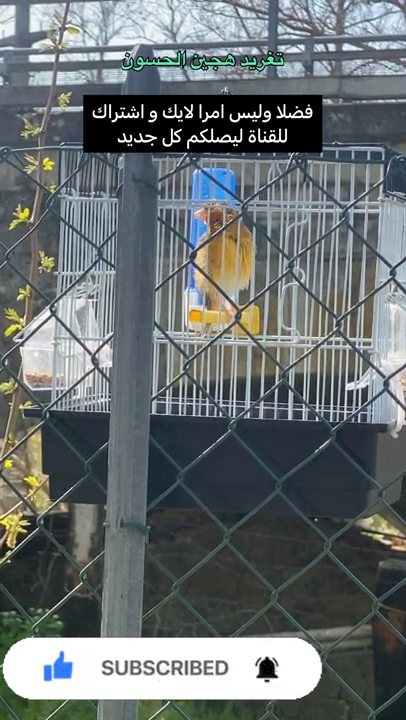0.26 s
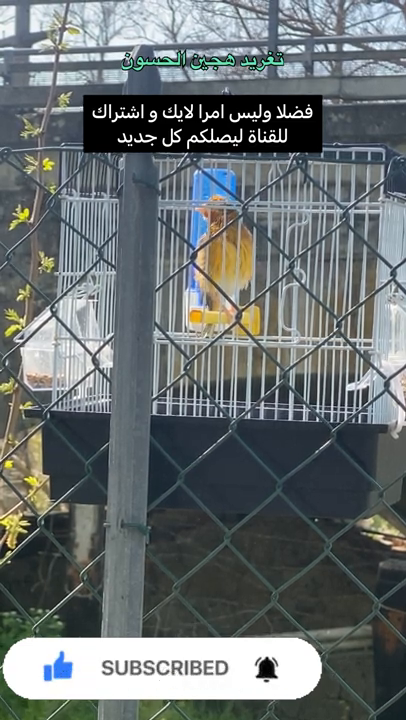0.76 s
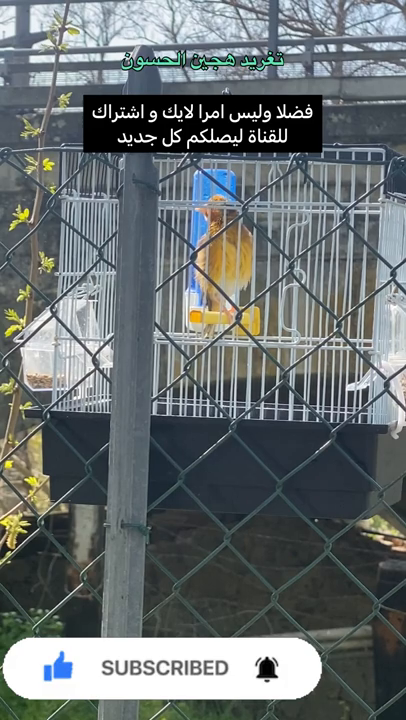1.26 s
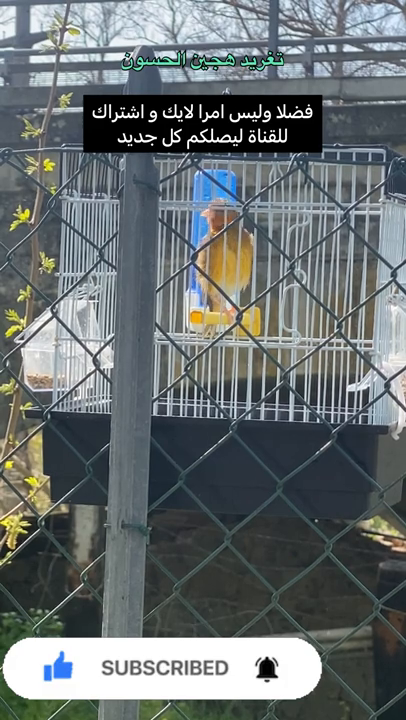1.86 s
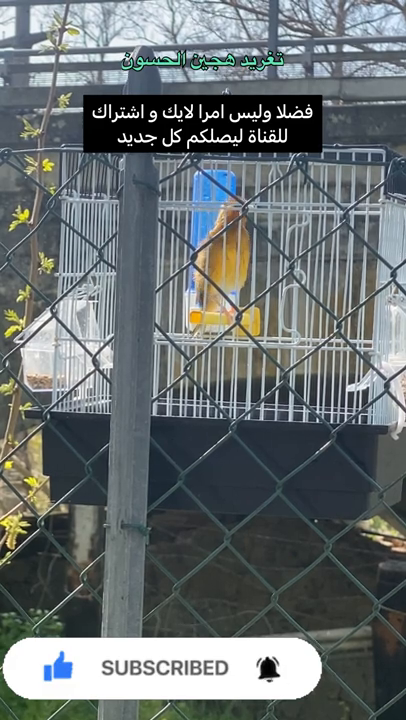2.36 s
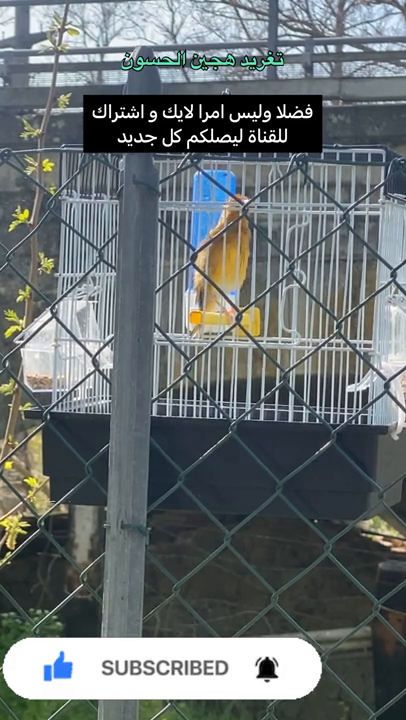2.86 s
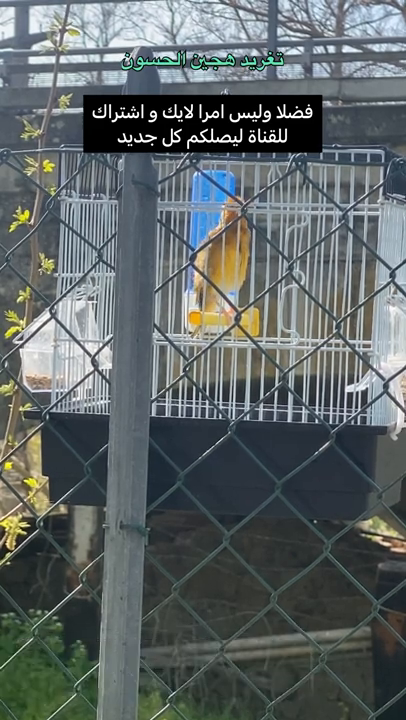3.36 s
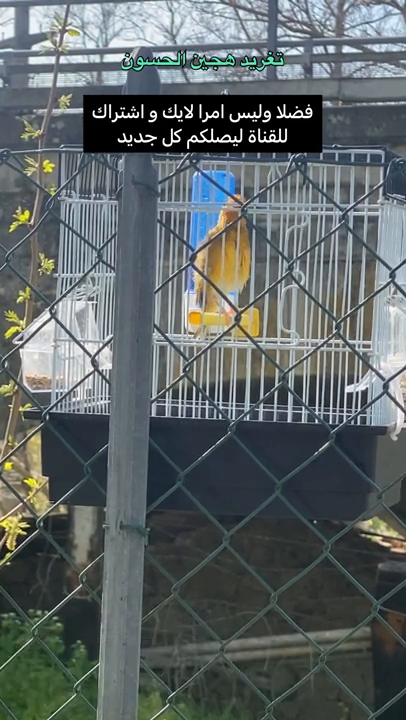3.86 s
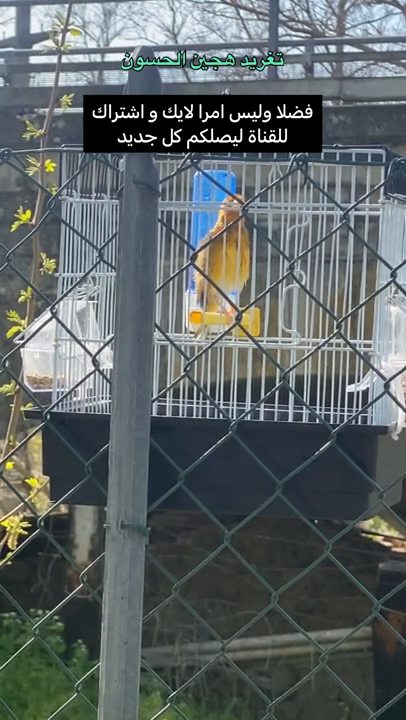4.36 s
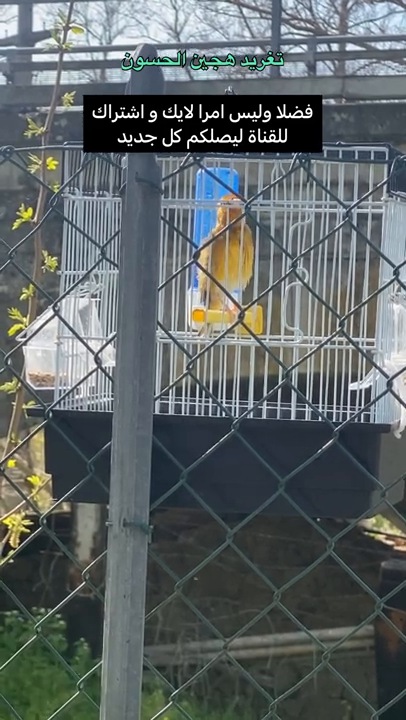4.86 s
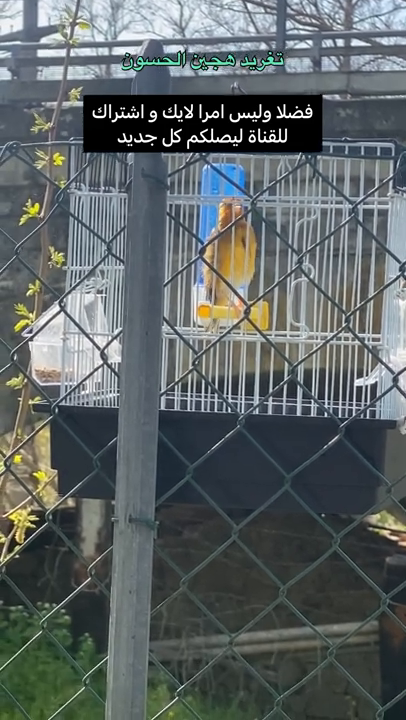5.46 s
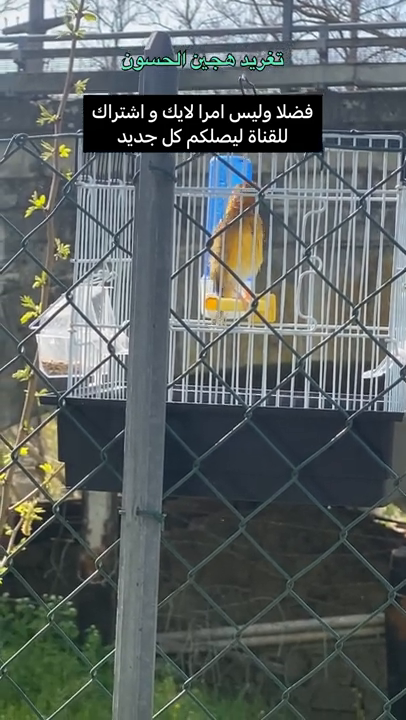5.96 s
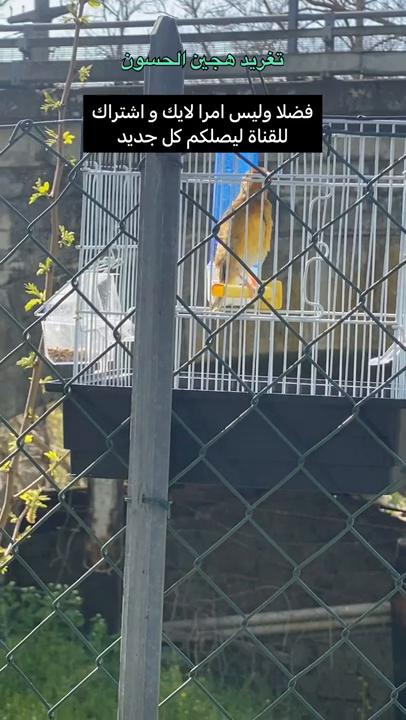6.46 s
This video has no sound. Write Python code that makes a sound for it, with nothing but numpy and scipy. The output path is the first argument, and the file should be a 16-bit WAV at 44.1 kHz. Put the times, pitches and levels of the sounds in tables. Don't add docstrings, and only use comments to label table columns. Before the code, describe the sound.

A caged finch sings a fast, varied song of whistles, chirps, buzzes and trills outdoors, with soft wind thumps on the microphone.

```python
import sys
import numpy as np
from scipy import signal
from scipy.fft import rfft, irfft
from scipy.io import wavfile
from scipy.ndimage import uniform_filter1d

SR = 44100
rng = np.random.default_rng(int(sys.argv[2]) if len(sys.argv) > 2 else 0)


def boost(x):
    u = np.asarray(x, float) / 20
    return 10 ** u


def pcm_store(signal):
    levels = np.round(np.clip(np.atleast_2d(signal), -1, 1) * 32767)
    wavfile.write(sys.argv[1], SR, levels.astype(np.int16).T)


N = 296352
WAVER_HZ = 12


def at_hz(points, hz):
    p = np.array(points, float)
    return np.interp(np.log(hz + 1), np.log(p[:, 0] + 1), p[:, 1])


def colour(x, points):
    return irfft(rfft(x) * boost(at_hz(points, np.fft.rfftfreq(N, 1 / SR))), N)


def rms_one(x):
    return x / np.sqrt(np.mean(x ** 2) + 1e-20)


def drift(rate_hz):
    r = np.exp(-2 * np.pi * rate_hz / SR)
    wander = signal.lfilter([1], [1, -2 * r, r * r], rng.standard_normal(N + SR))
    return rms_one(wander[SR:])


def sine(hz):
    return np.sin(2 * np.pi * np.cumsum(hz) / SR)


def span(rows):
    s, *columns = np.transpose(rows)
    i = np.arange(int((s[0] - .002) * SR), min(int((s[-1] + .002) * SR), N))
    fade = np.clip(np.minimum(i - i[0] - .001 * SR, i[-1] - i) / (.002 * SR), 0, 1)
    return i, fade, [np.interp(i / SR, s, c) for c in columns]


def distance():
    far_db, hum_hz, hum_db = -52, 291.3, -62
    # frequency in Hz, level in dB per Hz.
    far = [(120, 2.5), (300, -1.5), (500, -5), (1300, -8.5), (1900, -16), (3200, -19.5), (4400, -25),
           (5500, -31.5), (7400, -44.5), (13000, -48.5)]
    # frequency in Hz, likeness 0-1.
    likeness = [(100, 0.99), (300, 0.94), (550, 0.64), (1200, 0.52), (1600, 1), (2200, 0.95)]
    # frequency in Hz, excess in dB.
    left_excess = [(120, -3), (380, -0.5), (800, -5), (1250, -2.5), (1700, 0)]
    hz = np.fft.rfftfreq(N, 1 / SR)
    alike = np.clip(at_hz(likeness, hz), 0, 1)
    mid, side = rfft(rng.standard_normal((2, N)))
    pair = np.sqrt(1 + alike) * mid + np.sqrt(1 - alike) * side * [[1], [-1]]
    tilt_db = at_hz(left_excess, hz) * [[.5], [-.5]]
    wash = rms_one(irfft(pair * boost(at_hz(far, hz) + tilt_db) * (hz > 90), N))
    hum = boost(hum_db + 3.25 * drift(3.8)) * sine(hum_hz + 3 * drift(2.95))
    return boost(far_db + 0.42 * drift(0.4)) * wash + hum


def wind():
    # time in seconds, level in dB.
    gusts = [(0.0, -64.5), (0.03, -49.5), (0.63, -38.5), (0.67, -49.5), (1.33, -45.5), (1.35, -51),
             (3.84, -35), (4.04, -46), (4.12, -34), (5.33, -42.5), (5.97, -43), (5.99, -46), (6.05, -37.5),
             (6.23, -48), (6.51, -31), (6.59, -47), (6.64, -30), (6.72, -39)]
    # frequency in Hz, level in dB per Hz.
    eddies = [(12, -22.5), (20, -35.5), (45, 2), (64, 8.5), (78, 3.5), (173, -16.5), (260, -40.5),
              (340, -67), (570, -120)]
    level_db = np.interp(np.arange(N) / SR, *np.transpose(gusts))
    shared, own = (rms_one(colour(rng.standard_normal(N), eddies) * boost(2.6 * drift(16))) for _ in "LR")
    return boost(level_db) * (shared + boost(-24) * own * [[1], [-1]])


def vary(shape, s, db):
    scatter_share, scatter_db = .006, 1.5
    rows = np.array(shape, float)
    rows[:, 0] += s
    rows[:, 1] *= 1 + scatter_share * rng.standard_normal()
    rows[:, 2] += db + scatter_db * rng.standard_normal(len(rows))
    return rows


def notes(kind, rows):
    before, moved, swell_db, dying_db, bent, gained = kind
    onset_share = .42
    played = []
    for s, length, from_hz, to_hz, db in rows:
        note = []
        for u, p, g in ((0, 0, 0), (onset_share, bent, gained), (1, 1, 1)):
            pitch_hz = from_hz + p * moved * (to_hz - from_hz)
            note.append((s - (1 - u) * before * length, pitch_hz, db - (1 - g) * swell_db))
        note.append((s + (1 - before) * length, to_hz, db - dying_db))
        played.append(note)
    return played


def whistles():
    # time in seconds, pitch in Hz, level in dB.
    twitter = [
        [(.136, 2247, -55.5), (.158, 2664, -38)],
        [(.156, 2240, -42.5), (.166, 3020, -35), (.178, 3040, -36), (.184, 2996, -49.5), (.198, 3070, -48)],
        [(.797, 2500, -56), (.81, 3250, -48.5), (.826, 2780, -51)],
        [(.807, 3270, -49), (.813, 4060, -52), (.823, 4570, -52)],
        [(.828, 2940, -59.5), (.846, 3120, -54.5), (.86, 3310, -41.5), (.872, 3840, -46.5), (.884, 3670, -48.5)],
        [(.84, 2500, -55), (.858, 2940, -50.5)],
        [(.876, 2880, -43), (.892, 3130, -35.5), (.905, 3222, -39.5), (.93, 3264, -39.5), (.94, 3150, -51.5),
         (.95, 3640, -56), (.957, 3800, -55.5), (.965, 3990, -59)],
        [(1.806, 2110, -43.5), (1.812, 3730, -43.5), (1.82, 4160, -34.5), (1.832, 4340, -38.5),
         (1.841, 4540, -48.5)],
        [(2.082, 5050, -49), (2.091, 5590, -37.5), (2.104, 5710, -44), (2.116, 5060, -54)],
        [(2.165, 3430, -49), (2.172, 3163, -34.5), (2.198, 3230, -47), (2.214, 3256, -52), (2.228, 3395, -57.5),
         (2.25, 3390, -53)],
    ]
    # time in seconds,
    # pitch in Hz, level in dB.
    hooks = [
        [(1.182, 6680, -60.5), (1.192, 5950, -42.5), (1.204, 5580, -39.5), (1.215, 5640, -49)],
        [(.665, 3630, -58), (.7, 3720, -57)],
        [(5.457, 4210, -45), (5.475, 4480, -52)],
        [(.155, 3800, -53.5), (.159, 4700, -50.5)],
        [(.341, 3740, -59), (.346, 3170, -36.5), (.351, 2790, -37.5), (.362, 2690, -47.5), (.368, 2920, -53)],
        [(.686, 5600, -62.5), (.703, 5570, -44.5), (.714, 5526, -30.5), (.728, 5230, -48), (.75, 5230, -49)],
        [(.25, 5400, -50), (.263, 6500, -45), (.28, 7300, -46.5), (.298, 8100, -48)],
        [(2.6, 1990, -59), (2.615, 2600, -55)],
        [(2.625, 3050, -52), (2.65, 4400, -51)],
        [(4.493, 2990, -54), (4.51, 3350, -48), (4.522, 3730, -55.5), (4.531, 3780, -54)],
        [(4.494, 2420, -57.5), (4.506, 2640, -55.5), (4.521, 3400, -58)],
    ]
    # time in seconds, pitch in Hz, level in dB.
    long_whistles = [
        [(2.603, 2950, -54.5), (2.675, 7660, -29), (2.684, 7630, -47), (2.696, 7700, -75)],
        [(2.792, 4370, -44), (2.798, 4430, -34.5), (2.81, 4623, -32.5), (2.84, 4570, -32), (2.864, 4650, -31.5),
         (2.873, 4390, -39), (2.882, 4514, -29), (2.921, 4580, -40.5)],
        [(4.522, 3120, -65), (4.554, 3170, -35), (4.588, 3135, -29.5), (4.618, 3077, -32), (4.678, 3080, -34),
         (4.716, 3090, -42.5)],
        [(5.314, 4800, -32), (5.326, 6400, -26), (5.339, 7060, -30.5), (5.362, 7200, -61)],
        [(5.472, 5270, -40.5), (5.484, 5140, -40.5), (5.505, 5480, -51.5), (5.526, 5834, -37.5),
         (5.597, 5910, -31), (5.725, 6080, -48.5), (5.745, 5380, -28.5), (5.752, 5360, -29), (5.764, 5030, -53)],
        [(5.52, 4590, -53.5), (5.548, 3940, -51.5), (5.61, 3658, -45.5), (5.715, 3544, -46.5),
         (5.738, 3700, -56), (5.801, 2130, -41), (5.815, 1910, -62), (5.84, 1840, -57)],
    ]
    # multiple of pitch, level in dB.
    lower_overtones = [(2, -21.5), (3, -26.5)]

    # share of length before the peak, share of pitch move done there, swell in dB,
    # dying in dB, shares of that move and of the swell done in the quick start.
    chip = (0.44, 1.2, 19, 24, 0.36, .5)
    swell = (0.82, .95, 17.5, 4.6, .5, 0.47)
    flick = (0.56, 0.94, 19.3, 13.4, .58, 0.74)
    drop = (0.52, 0.85, 14, 7, .55, 0.61)
    glide = (0.45, 0.82, 3.3, 6.1, 0.2, .45)
    # peak time in seconds, length in seconds, from Hz, to Hz, peak level in dB.
    chips = [(1.23, 0.031, 4030, 4270, -36), (1.494, 0.046, 6020, 5680, -39.5),
             (1.51, 0.022, 1960, 3060, -38.5), (1.792, 0.029, 5840, 5610, -28.5),
             (5.314, 0.017, 3080, 4160, -33)]
    swells = [(1.526, 0.02, 3800, 4410, -37.5), (2.128, .055, 3600, 4920, -41.5),
              (2.412, 0.039, 3130, 4314, -35.5), (2.738, 0.016, 6300, 5460, -21.5),
              (3.447, 0.021, 2164, 3474, -34.5), (5.309, 0.024, 3120, 3330, -45.5),
              (5.449, 0.032, 2930, 3780, -40.5), (6.489, 0.021, 3114, 3550, -29)]
    flicks = [(2.778, 0.027, 2620, 4520, -27.5), (2.971, 0.022, 2770, 3763, -29.5),
              (2.992, 0.021, 2050, 3590, -34.5), (3.426, 0.026, 2460, 3754, -29),
              (5.989, 0.025, 2820, 4436, -31.5), (6.17, 0.026, 3000, 4480, -31.5)]
    drops = [(0.325, 0.048, 5290, 4820, -42.5), (2.317, 0.048, 7520, 5900, -36),
             (2.323, 0.038, 5850, 4940, -34), (2.499, 0.034, 5480, 4510, -44.5),
             (2.498, .024, 7070, 5540, -34.5), (2.56, 0.018, 7220, 5650, -30),
             (2.565, 0.013, 5140, 4440, -43)]
    glides = [(1.218, 0.013, 2300, 4090, -41.5), (2.382, 0.0067, 2124, 3200, -48),
              (2.472, 0.014, 2460, 2330, -51.5), (5.457, 0.024, 4420, 5480, -26)]

    # seconds after onset, pitch in Hz, level in dB.
    plunge = [(.003, 7230, -58), (.0055, 6300, -38.5), (.008, 4800, -29)]
    # seconds after onset, share of the held pitch, level in dB.
    dive_hold = [(0.011, .94, -33.5), (0.019, .99, -29.5), (0.029, 1.001, -42.5), (.048, .999, -46),
                 (.056, 1.002, -53.5)]
    # seconds after onset, pitch in Hz, level in dB.
    afternote = [(.031, 3040, -53.5), (.04, 2700, -55.5), (.048, 2650, -51)]
    # onset in seconds, level in dB, held pitch in Hz, afternote level in dB.
    dives = [
        (0.957, 0, 4350, -3),
        (1.391, -5, 4090, -3),
        (1.676, -1.5, 4040, -11),
        (1.988, -1, 4145, -31),
    ]

    # seconds after onset, pitch in Hz, level in dB.
    turn_shape = [
        [(0, 3100, -53), (.012, 3133, -48), (.026, 3264, -34.5), (.034, 3550, -45), (.043, 3380, -55.5)],
        [(.043, 3360, -55), (.049, 3030, -63), (.056, 2870, -44.5)],
        [(.03, 2607, -58.5), (.045, 2626, -42), (.06, 2680, -37.5), (.074, 2720, -49.5), (.09, 2920, -58),
         (.104, 3015, -50), (.113, 3160, -44)],
    ]
    # onset in seconds, level in dB.
    turns = [(1.278, -2), (1.573, -1.5), (1.876, 0.4)]
    # seconds after onset, pitch in Hz, level in dB.
    under_shape = [
        [(.001, 2404, -52), (.019, 2755, -45.5)],
    ]
    # onset in seconds, level in dB.
    unders = [(1.281, 0), (1.573, -0.5), (1.875, -3), (5.287, -7.5), (5.421, -2)]
    # seconds after onset, pitch in Hz, level in dB.
    slide_shape = [
        [(.012, 6810, -41), (.0135, 6450, -28.5), (.015, 6070, -28.5), (.017, 5190, -28.5),
         (.0195, 4660, -38.5)],
        [(.027, 4590, -44), (.034, 4190, -43), (.042, 3724, -43), (.048, 3780, -43)],
        [(.047, 3200, -42.5), (.055, 3106, -39.5), (.071, 2290, -37.5), (.081, 2150, -50)],
    ]
    slides = [3.723, 3.8209, 3.9161, 4.0089, 4.099, 4.1903, 4.283, 4.377]
    # start in seconds, length in seconds, pitch scatter in Hz.
    rasps = [(.795, .028, 200), (.85, .035, 60), (1.212, .03, 120), (.25, .09, 110), (1.305, .03, 50),
             (1.51, .03, 110), (1.815, .03, 120), (2.11, .04, 100), (2.62, .07, 60), (2.762, .022, 150),
             (5.315, .045, 120), (5.455, .04, 110), (5.73, .035, 110), (6.475, .025, 60)]

    out = np.zeros(N)
    waver_hz, flutter_db = WAVER_HZ * drift(150), .8 * drift(68)
    rasp = drift(370)
    for s, length, scatter_hz in rasps:
        i = slice(int(s * SR), int((s + length) * SR))
        waver_hz[i] += scatter_hz * rasp[i]

    played = long_whistles + twitter + hooks
    for k, db in lower_overtones:
        played = played + [np.multiply(long_whistles[-1][:4], [1, k, 1]) + [0, 0, db]]
    for kind, rows in ((chip, chips), (swell, swells), (flick, flicks), (drop, drops), (glide, glides)):
        played = played + notes(kind, rows)
    for s, db, held_hz, after_db in dives:
        dive = plunge + [(t, share * held_hz, level) for t, share, level in dive_hold]
        played = played + [np.add(dive, [s, 0, db]), np.add(afternote, [s, 0, after_db])]
    for shape, onsets in ((turn_shape, turns), (under_shape, unders), (slide_shape, [(s, 0) for s in slides])):
        played = played + [vary(part, s, db) for s, db in onsets for part in shape]

    for rows in played:
        i, fade, (hz, db) = span(rows)
        hz = uniform_filter1d(hz, size=min(len(i) // 9 + 1, 150), mode="nearest")
        out[i] += fade * boost(db + 4.5 + flutter_db[i]) * sine(hz + waver_hz[i])
    return out


def slurs():
    # time in seconds, pitch in Hz, level in dB, loss per overtone in dB.
    opening = [
        [(.2, 1400, -54, -4), (.24, 2150, -55.5, -12), (.272, 3150, -46.5, 1), (.292, 3420, -38, 17),
         (.3, 3950, -43.5, 16), (.313, 4050, -51.5, 15)],
        [(.208, 2030, -57, -9.5), (.235, 2330, -42, -1.5), (.25, 2180, -55.5, -17)],
        [(.25, 2850, -43, -2), (.26, 3250, -51, 6), (.277, 3900, -46.5, 3), (.288, 4100, -45, 3),
         (.298, 4700, -50.5, 2)],
        [(.535, 1292, -46.5, 8), (.555, 1357, -40.5, 4.5), (.583, 1764, -44, 0), (.615, 2200, -56.5, -10.5),
         (.65, 3320, -39.5, 18)],
        [(.58, 2210, -46.5, -8.5), (.612, 2410, -47.5, 7.5)],
        [(.62, 3230, -40.5, 8.5), (.64, 3300, -52.5, 2.5), (.658, 4100, -39.5, 46.5)],
    ]
    # time in seconds, pitch in Hz, level in dB, loss per overtone in dB.
    closing = [
        [(6.034, 2100, -53, 15), (6.047, 2900, -54.5, 8), (6.075, 3800, -39, 0.5), (6.081, 3950, -51.5, 4)],
        [(6.21, 1850, -47.5, 16), (6.224, 2850, -55, 8.5), (6.252, 3650, -39, 8), (6.26, 3900, -45.5, 3)],
        [(6.312, 1420, -47, 26), (6.35, 1900, -50.5, 13.5), (6.39, 2290, -28, 32), (6.41, 2420, -32, 48),
         (6.44, 2720, -68, 18.5), (6.472, 3120, -54, 27.5)],
        [(6.565, 1560, -50.5, 11), (6.6, 1950, -48, 17), (6.632, 2280, -26.5, 30.5), (6.66, 2520, -46, 47),
         (6.678, 2560, -45, 25.5), (6.696, 2480, -49, 32)],
    ]
    # seconds after onset, pitch in Hz, level in dB, loss per overtone in dB.
    rattle = [(.005, 2947, -53, 13.5), (.009, 2583, -36.5, 29.5), (.012, 2430, -29, 42.5),
              (.015, 2153, -30.5, 27), (.018, 1850, -40, 14), (.022, 1440, -44.5, 6)]
    # seconds after onset, pitch in Hz, level in dB, loss per overtone in dB.
    long_rattle = [(.004, 3320, -43, 25), (.008, 2770, -43, 26), (.012, 2380, -29, 42),
                   (0.017, 2074, -35, 24), (.019, 1600, -39.5, 12), (0.023, 1152, -31, 12)]
    rattles = [4.767, 4.805, 4.844, 4.877, 4.914, 4.95, 4.992, 5.026, 5.067, 5.1, 5.139, 5.175, 5.218]
    # frequency in Hz, gain in dB.
    throat = [(1200, -17.5), (2500, -1.5), (4500, 0.5), (7000, -8), (9000, -41.5), (16000, -29)]

    out = np.zeros(N)
    waver_hz = 1.5 * WAVER_HZ * drift(200) + 2.5 * WAVER_HZ * drift(45)
    strokes = [vary((rattle, long_rattle)[k % 2], s, 0) for k, s in enumerate(rattles)]
    closing_s = closing[0][0][0] - .01
    for rows in opening + closing + strokes:
        i, fade, (hz, db, loss_db) = span(rows)
        phase = 2 * np.pi * np.cumsum(hz + waver_hz[i]) / SR
        further_db = np.where(loss_db < 1, 9.5, loss_db) + 14 * (rows[0][0] > closing_s)
        for k in range(1, 7):
            total_loss_db = loss_db + further_db * (k - 2) if k > 1 else 0
            level = boost(db + 2 - total_loss_db + at_hz(throat, k * hz))
            out[i] += fade * level * np.sin(k * phase) * (k * hz < .45 * SR)
    return out * (1 + np.where(np.arange(N) < SR, .3, .12) * drift(450))


def buffets():
    swing_hz, length_s = 176, 0.0025
    # time in seconds, level in dB.
    knocks = [(0.937, -30), (1.126, -37), (3.018, -30)]
    t = np.arange(N) / SR
    out = np.zeros(N)
    for s, db in knocks:
        envelope = np.exp(-((t - s) / length_s) ** 2)
        out += boost(db) * envelope * np.sin(2 * np.pi * swing_hz * (t - s))
    return out


def buzz():
    first_puff_s, puffs_per_s, slowing_per_s2 = 3.055, 110.85, 46.4
    # time in seconds, pitch in Hz, level in dB, hoarseness 0-1, lower voice in dB.
    course = [
        (3.0425, 5170, -39, 0.22, -34),
        (3.06, 5310, -22, 0.08, -70),
        (3.09, 5200, -20, 0.04, -36),
        (3.11, 5000, -31.5, 0.55, -22),
        (3.135, 6170, -23.5, 0.3, -5),
        (3.25, 6474, -23, 0.35, -10.5),
        (3.37, 6230, -26, 0.38, -5.5),
        (3.379, 6010, -31, 0.48, -18),
    ]
    out = np.zeros(N)
    i, fade, (hz, db, hoarse, low_db) = span(course)
    t = i / SR - first_puff_s + .0007 * hoarse * drift(40)[i]
    count = puffs_per_s * t - slowing_per_s2 * t ** 2 / 2
    cycle = (count + .5) % 1 - .5
    puff = np.exp(-(cycle / np.where(cycle < 0, .11, .15)) ** 2 / 2) + .55 * hoarse
    puff = puff * boost(1.2 * rng.standard_normal(size=60))[(count + 2.5).astype(int)]
    sweep = np.where(cycle < 0, .4 - .55 * hoarse, .04 + .25 * hoarse) * np.tanh(cycle / .22)
    phase = 2 * np.pi * np.cumsum(hz * (1 + sweep + 0.065 * hoarse * drift(60)[i])) / SR
    hiss_db = [(1700, -28.0), (2300, -4.5), (5000, 2.5), (9000, -15.5), (16000, -12)]
    hiss = 1.35 * hoarse * rms_one(colour(rng.standard_normal(N), hiss_db))[i]
    grit = hoarse * drift(2100)[i]
    low = boost(low_db) * np.sin(phase / 2 + 1.8 * hoarse * drift(920)[i])
    level = boost(db - 6.5 + 1.7 * hoarse * drift(500)[i])
    out[i] = fade * level * puff * (np.sin(phase + 0.97 * grit) + low + hiss)
    return out


def warble():
    # time in seconds, pitch in Hz, level in dB, swings done, swing in Hz.
    course = [
        (3.495, 4600, -52, -2.6, 450),
        (3.5115, 4720, -31, 1, 440),
        (3.5615, 4720, -26, 12, 480),
        (3.5812, 5110, -23, 16, 480),
        (3.6116, 5490, -21.5, 22, 460),
        (3.6443, 6130, -21, 28, 430),
        (3.6699, 6570, -22, 32, 270),
        (3.6773, 6520, -22, 33, 380),
        (3.692, 6050, -31, 34.25, 750),
    ]
    out = np.zeros(N)
    i, fade, (hz, db, swings, swing_hz) = span(course)
    wobble = np.cos(2 * np.pi * uniform_filter1d(swings, size=300, mode="nearest"))
    swung_hz = swing_hz * wobble * (1 + .06 * drift(120)[i])
    out[i] = fade * boost(db - 4 + .8 * wobble) * sine(hz + swung_hz + 35 * drift(400)[i])
    return out


def finch():
    hard_blow = 0.025
    breath_db = -29
    # power of the pressure, level in dB.
    overtones = [(2, -38.5), (3, -40.5), (4, -57)]
    # frequency in Hz, gain in dB.
    beak = [(1500, -13.5), (3000, 6.5), (6200, -4), (9000, 7.5), (12000, 8), (16000, 9)]
    # frequency in Hz, level in dB per Hz.
    breath_colour = [(1500, 1.5), (3000, -14.5), (6500, 7), (9000, -21.5), (16000, 14)]
    # start in seconds, length in seconds, gain of octave and hiss in dB,
    # gain of higher overtones in dB.
    strain = [(0.157, 0.016, 18, -13), (0.196, 0.13, 3, -7), (0.539, 0.071, 7, -4), (0.831, 0.023, 29.5, 7),
              (0.9, 0.057, 33, 5), (0.964, 0.05, -9, -4), (1.281, 0.015, 33, 6), (1.493, 0.0076, 18, 9),
              (1.564, 0.029, 34.5, 5), (1.807, 0.0035, 29.5, 13), (1.873, 0.022, 44.5, 18),
              (2.07, 0.061, 11, 15), (2.196, 0.047, 48.5, 15), (2.486, 0.083, -7, 13),
              (2.599, 0.083, -4, -0.5), (2.759, 0.019, 4, 2.5), (2.793, 0.28, 1, 2.5), (3.158, .06, -4, -1),
              (3.216, .16, 0.5, -3.5), (3.484, 0.13, 9.5, 5), (3.737, 0.31, 15, 1),
              (4.088, 0.21, 14.5, 2.5), (4.491, 0.04, 40.5, 18), (4.535, 0.16, -6, 3.5),
              (4.768, 0.574, -10, -19), (5.288, 0.026, 34, 23.5), (5.312, 0.058, -4.5, -5),
              (5.424, 0.018, 48, 20.5), (5.477, 0.29, 4.5, 10.5)]

    tone = whistles() + slurs() + warble() + buzz()
    effort = np.sqrt(2 * uniform_filter1d(tone ** 2, size=200) + 1e-9)
    strain_db = np.zeros((2, N))
    for s, length, *db in strain:
        strain_db[:, int(s * SR):int((s + length) * SR)] = np.c_[db]
    strain_db = uniform_filter1d(strain_db, size=300) + 3 * drift(25)

    extra = np.zeros(N)
    for k, db in overtones:
        bent = 2 ** (k - 1) * tone * (tone / effort) ** (k - 1)
        extra += boost(db + strain_db[int(k > 2)]) * bent
    extra *= (effort / hard_blow) ** 0.043
    extra = signal.sosfilt(signal.butter(4, 1800, "high", fs=SR, output="sos"), extra)
    hiss = rms_one(colour(rng.standard_normal(N), breath_colour))
    breath = boost(breath_db + 0.5 * strain_db[0]) * effort * hiss
    return tone + colour(extra, beak) + breath


def yard(x):
    tail_db, t60_s, cut_hz = -23.5, 0.34, 10000
    # delay in seconds, level in dB.
    echoes = [(.0045, -21), (.0068, -20), (.021, -28)]
    t = np.arange(SR // 2) / SR
    tail = rng.standard_normal(len(t)) * boost(-60 * t / t60_s) * np.clip(t / 0.0067, 0, 1)
    tail = signal.sosfilt(signal.butter(2, cut_hz, fs=SR, output="sos"), tail)
    tail *= boost(tail_db) / np.sqrt(np.sum(tail ** 2))
    for s, db in [(0.00065, 0.0015)] + echoes:
        tail[int(s * SR)] += boost(db)
    return signal.fftconvolve(x, tail)[:N]


def scene():
    return yard(finch()) + wind() + buffets() + distance()


def roll_off(x):
    return signal.sosfilt(signal.butter(12, 17110, fs=SR, output="sos"), x)


def record(dry):
    # frequency in Hz, lead in radians.
    left_lead = [(200, 0), (600, -.6), (1300, 0), (1890, .3), (2580, 1.2), (3400, .55), (4000, .6),
                 (4650, 1.7), (5000, 4.4), (5340, 6.4), (5700, 6.9), (9400, 8.3), (14000, 9.3)]
    lag = np.exp(-1j * at_hz(left_lead, np.fft.rfftfreq(N, 1 / SR)))
    mix = np.array([dry[0], irfft(rfft(dry[1]) * lag, N)])
    return roll_off(mix)


dry = scene()
out = record(dry)
pcm_store(out)
```